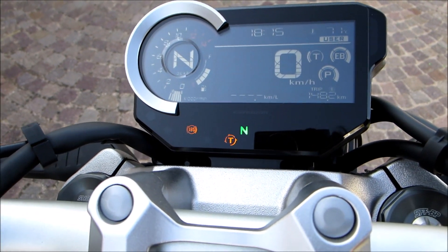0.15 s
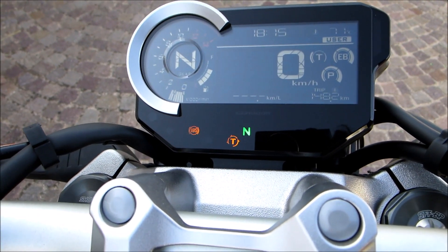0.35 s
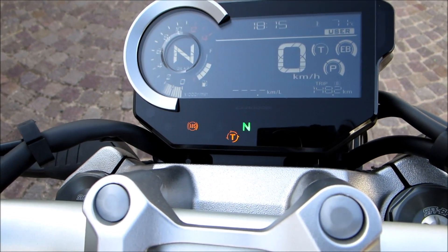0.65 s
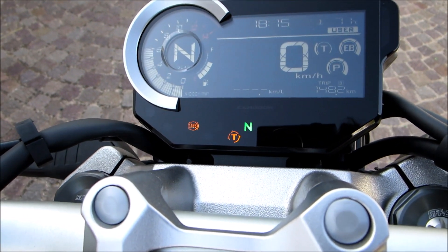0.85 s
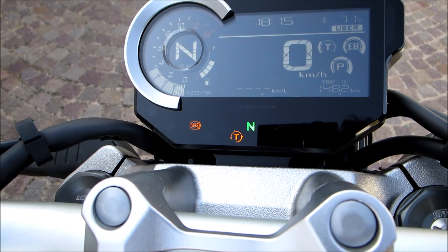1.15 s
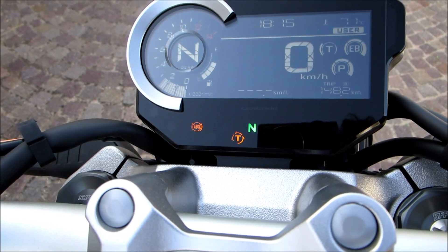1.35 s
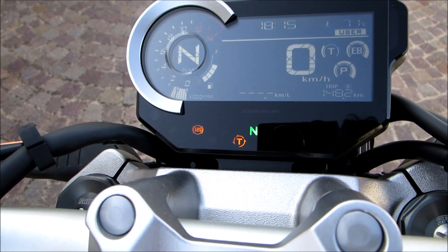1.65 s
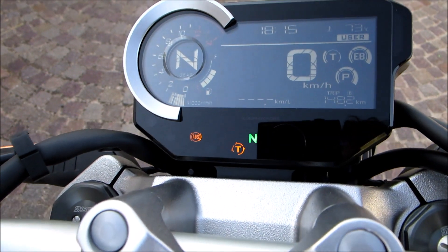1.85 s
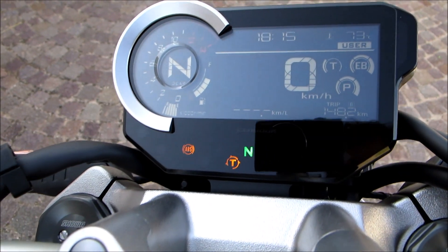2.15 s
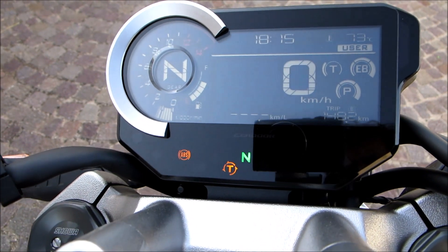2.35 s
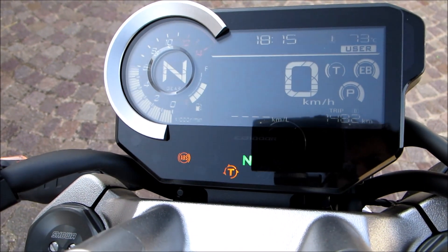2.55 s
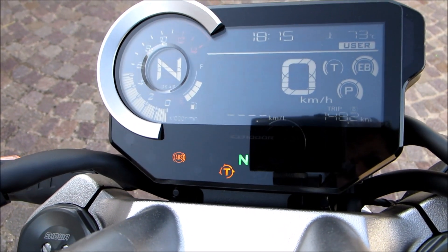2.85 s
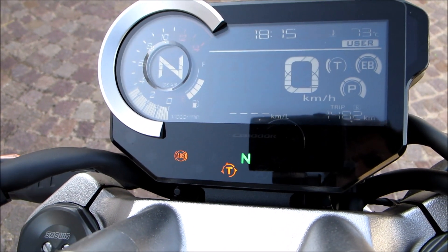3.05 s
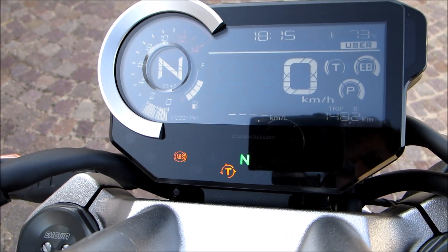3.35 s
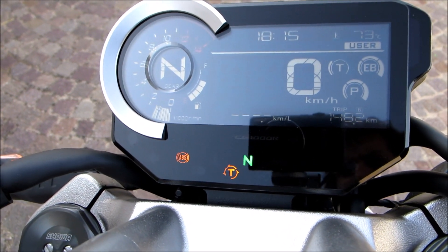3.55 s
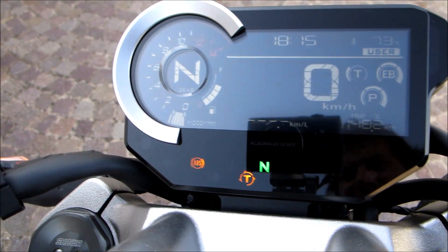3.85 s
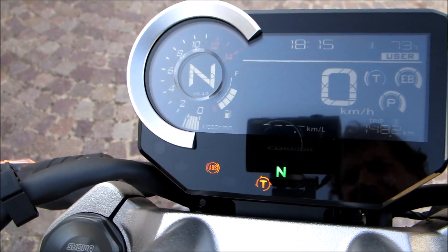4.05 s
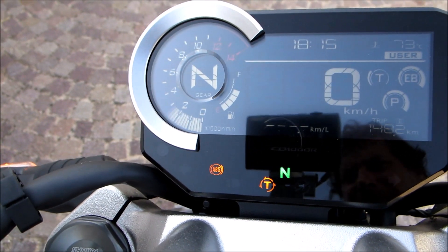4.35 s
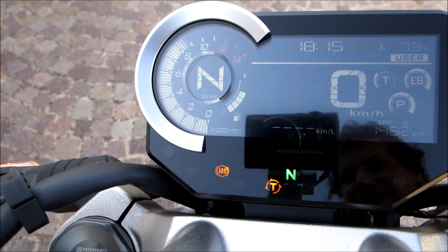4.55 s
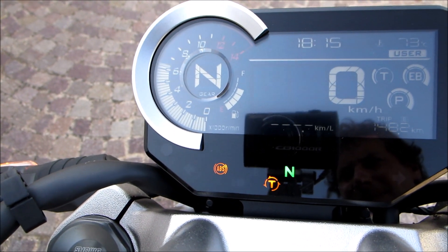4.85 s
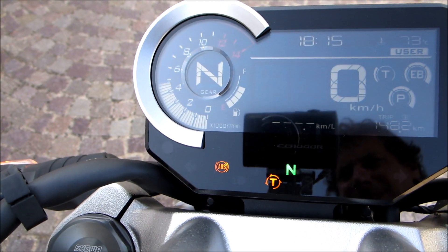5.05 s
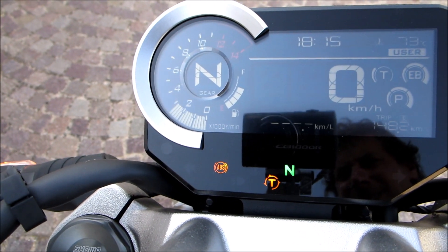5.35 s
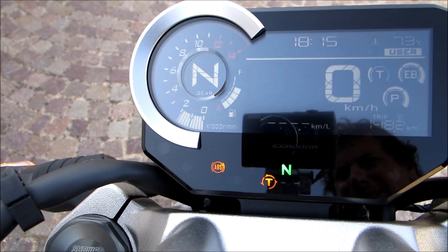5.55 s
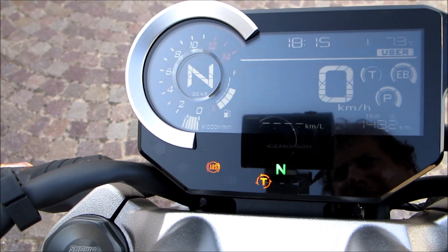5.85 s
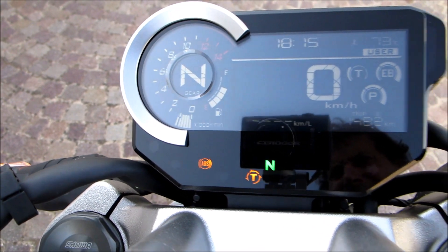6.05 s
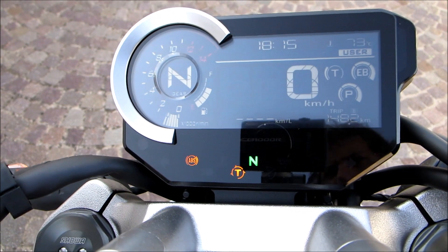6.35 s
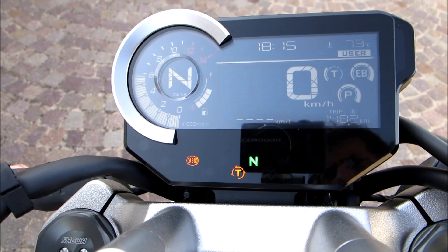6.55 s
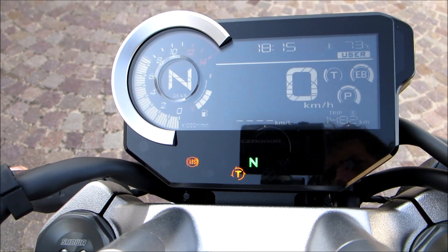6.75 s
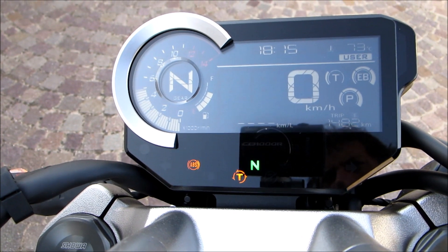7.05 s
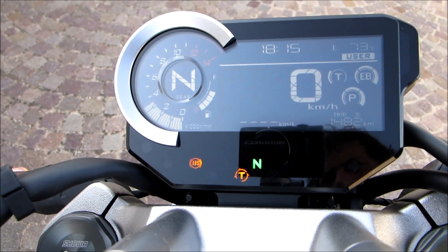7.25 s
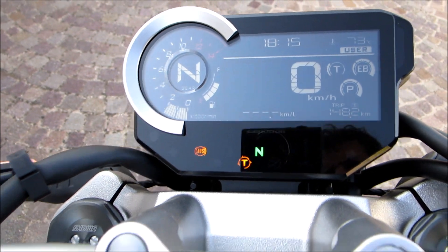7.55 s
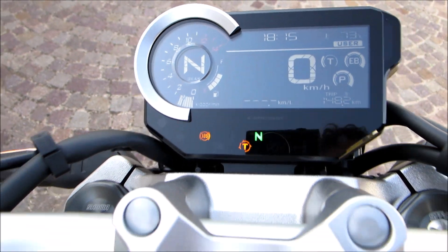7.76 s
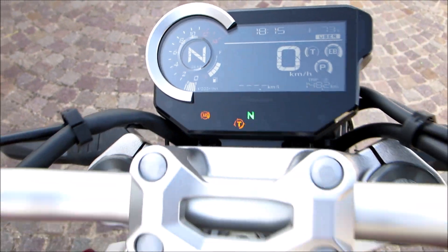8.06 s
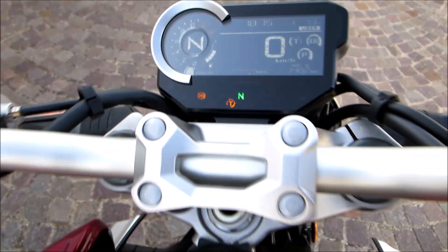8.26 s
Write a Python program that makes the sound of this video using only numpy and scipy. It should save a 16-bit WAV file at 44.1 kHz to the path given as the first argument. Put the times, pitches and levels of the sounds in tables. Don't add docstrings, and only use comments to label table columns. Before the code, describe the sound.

A stationary four-cylinder motorcycle is heard from the saddle, close and outdoors over stone paving, in stereo with only a very short ground echo. From 0 to 0.55 seconds it idles loud and uneven, with about 38 firings a second, clattering valve gear and hard metallic cracks. At 0.6 the throttle snaps open: air gulps in, the growl climbs fast, peaks near 0.8, then glides down smoothly until about 1.4. Lumpy idle ticks on. A second, quickest blip rises from 2.35, peaks near 2.6 and falls until 3.4. Stumbling, somewhat quieter idle follows. The third, longer blip begins at 4.25, peaks around 4.55 with a soft exhaust thump, and sinks until 5.5. After more faltering idle, the last, rounder blip starts at 6.4, peaks near 6.65 and falls until 7.5. Rough idling, low shudder and light hiss continue to the end at 8.4.

```python
import sys
import numpy as np
from scipy import signal
from scipy.fft import rfft, irfft
from scipy.io import wavfile
from scipy.ndimage import uniform_filter1d

SR = 44100
rng = np.random.default_rng(int(sys.argv[2]) if len(sys.argv) > 2 else 0)


def wav_record(signal):
    frames = np.transpose(np.atleast_2d(signal))
    bounded = np.clip(frames, -1, 1)
    quanta = np.round(bounded * 32767).astype(np.int16)
    wavfile.write(sys.argv[1], SR, quanta)


def undo_db(level):
    steps = np.asarray(level, float) / 20
    return 10 ** steps


N = 369999
T = np.arange(N) / SR

# open_s, shut_s (fuel is cut), relight_s
BLIPS = [
    (0.585, 0.772, 1.44),
    (2.344, 2.587, 3.385),
    (4.24, 4.546, 5.49),
    (6.37, 6.649, 7.52),
]
# up_s (passes 100 firings a second), climb_per_s, down_s (passes 100 again),
# sharpness of the top (no unit)
REVS = [
    (0.691, 8.5, 1.268, 5.0),
    (2.464, 9.2, 3.177, 4.2),
    (4.363, 6.7, 5.313, 4.7),
    (6.464, 7.2, 7.346, 3.5),
]
DRAG_PER_S, FRICTION_HZ = .75, 187
CATCH_HZ, SETTLE_HZ_PER_S = 76.3, 85
# time_s, firing_rate_hz
IDLE_SPEED = [(0.0, 37.08), (0.12, 40.4), (0.4, 38.47), (0.55, 39.91), (1.8, 39.08), (2.0, 34.47),
              (2.2, 40.43), (2.34, 33.92), (3.72, 35.74), (3.95, 37.54), (4.1, 36.12), (5.9, 36.36),
              (6.25, 36.17), (7.8, 36.7), (8.39, 37.56)]
# time_s, level_db
LOUDNESS_DRIFT = [(0.0, 12), (0.3, 10.5), (0.56, 11.5), (0.82, 2), (1.1, 7.5), (1.4, 4), (1.75, 3), (2.3, 5),
                  (2.7, -1.5), (3.1, 2), (3.7, 1.2), (4.2, 2.5), (5.0, -0.6), (5.9, -0.8), (6.3, 1.5),
                  (7.2, -0.7), (7.9, -1.2), (8.39, -0.3)]

# pitch_hz, level_db
PIPE = [(15, -48), (37, -25), (75, -11.5), (95, 1.5), (112, 7.5), (135, -1), (165, -14), (230, -3),
        (300, -6), (420, -14), (900, -63.5)]
# firing_rate_hz, level_db
BOOM_OPEN = [(42, -11), (58, -11.5), (80, -15.5), (115, -10), (165, -20), (220, -14.5), (290, -14.5)]
# firing_rate_hz, level_db
BOOM_CUT = [(68, -24.5), (95, -16.5), (120, -11.5), (140, -16.5), (165, -23), (205, -15.5), (250, -16),
            (290, -19)]
BOOM_IDLE_DB = -22
# time_s, level_db, length_s
STUMBLES = [(0.192, -13, 0.0079), (0.24, -12, 0.013), (0.438, -7, 0.025), (1.615, -9, 0.018),
            (2.25, -5, .02), (3.54, -7, 0.048), (3.725, -5.5, 0.044), (4.002, -10, 0.017),
            (4.09, -16, 0.01), (4.139, -11, 0.015), (4.235, -10, 0.025), (5.556, -12, .015),
            (5.622, -8, 0.011), (5.69, -6, 0.02), (5.779, -23, .022), (5.913, -4.5, .03),
            (6.09, -11, 0.019), (6.23, -9, .022), (7.736, -6, 0.039), (8.066, -8, 0.014),
            (8.197, -10, .018)]
PUMP_FALL_DB, PUMP_SCATTER_DB = -15.5, .4
SOFT_HZ, SOFT_SPAN_HZ, SOFT_DB = 95, 20, -8
UNEVEN_HZ, UNEVEN_SPAN_HZ, UNEVEN_DROP_DB = 218, 60, -12
# start_s, level_db, pitch_hz, length_s
LATE_BURNS = [
    (4.6, -25, 95, 0.076),
    (6.679, -31, 92.2, 0.076),
]

# pitch_hz, level_db (per Hz)
SHELL_SHUT = [(100, -26.5), (170, -9), (220, -8), (310, -6.5), (445, -4.5), (564, -17.5), (600, -5),
              (775, -7), (967, -4.5), (1400, -17.5), (1820, -35), (3080, -120)]
# pitch_hz, level_db (per Hz)
SHELL_OPEN = [(150, -36.5), (250, -4), (346, 2), (445, -7.5), (514, -5), (732, 4.5), (792, 8), (915, 2.5),
              (1400, -13), (1820, -84), (3080, -120)]
# pitch_hz, level_db (per Hz)
SHELL_FAST = [(190, -50), (320, -7), (484, -11), (551, -10), (828, 2.5), (903, 0), (1400, -9), (1820, -73),
              (3080, -120)]
# pitch_hz, level_db
CASING = [(130, -51.5), (200, -1), (330, -3), (440, -5.5), (580, -0.5), (750, -2.5), (900, -3.5),
          (1200, -7), (1700, -19.5), (2500, -18), (3200, -28)]
# pitch_hz, width_hz, level_db
RINGS = [(535, 33, 5.5), (909, 10.6, 9.5), (1044, 115, 5), (1703, 29, 3.5), (2416, 160, 3.5), (2676, 80, 7),
         (3530, 23, 5.5), (4190, 9.9, 6.5), (5640, 59, 0.5)]
# growl_db, gulp_db (first gulp of air), gulp_after_s
TWISTS = [
    (-14.5, -25.5, 0.055),
    (-15.5, -26.5, 0.08),
    (-16, -30.5, 0.12),
    (-15.5, -32, 0.097),
]
TWIST_S, GULP_S = .13, 0.048
LEAD_S, DRAUGHT_S, DRAUGHT_DB = 0.044, 0.043, -24
# time_s, level_db
RATTLES = [
    (0.35, -36),
    (1.685, -39),
    (2.27, -47),
    (6.26, -54),
    (8.37, -44.5),
]
RATTLE_S = 0.029
# start_s, peak_db, pitch_hz
CRACKS = [(0.148, -11.5, 910), (0.249, -14, 890), (0.272, -11.5, 1040), (0.374, -16, 935), (0.619, -7, 920),
          (0.648, -4, 783), (0.672, -5, 783), (0.708, -3.5, 900), (1.662, -21, 1080), (2.084, -20, 914.5),
          (2.164, -15, 790), (2.266, -18, 901), (2.418, -1, 785), (3.583, -20, 935), (3.778, -23, 950),
          (3.801, -19, 930), (4.011, -18, 1003), (4.152, -22, 890), (4.236, -17.5, 950), (5.57, -20.5, 940),
          (5.798, -21.5, 1041), (6.121, -24, 998), (6.259, -18, 1040), (6.451, -10, 836),
          (6.488, -4.5, 805), (7.797, -25, 946)]

# pitch_hz, level_db (per Hz)
CLATTER = [(760, -27.5), (1300, -4.5), (1410, -2.5), (1690, -0.5), (1970, -4), (2500, -7), (3100, -17.5),
           (4030, -25.5), (6820, -120)]
# pitch_hz, level_db (per Hz)
HISS = [(1710, -66), (2900, -2), (3240, -4.5), (3810, -3), (5230, -5.5), (5690, -5), (7490, -9.5),
        (13000, -18), (14600, -19), (15500, -33)]
RUSH_DB, RUSH_PER_OCTAVE_DB, RUSH_LAG_S = -31, 31, 0.024
GULP_HISS_DB, COAST_DRIFT = -6.5, 0.5
# idle_db, moving_db (at 100 firings a second), speed_db (per octave), drift_share (of the
# loudness drift at speed, no unit), shake_db
LAYERS = [
    (-34.5, -29.5, 8, 0.47, 1),
    (-46, -37.5, 8, 0.56, 2.5),
    (-53, -47, 9.5, 0.77, 2),
]
SHAKE_HZ, SHAKE_OCTAVES = 140, 0.63
SAG_AFTER_S, SAG_S, SAG_DB = 0.35, 0.12, -2.5

# pitch_hz, level_db
SHUDDER = [(10, -16), (35, 7), (55, -11), (200, 2), (600, -35.5)]
RUMBLE_DB = -48
ECHO_S, ECHO_DB = (0.00621, 0.00705), -21.5
# pitch_hz, likeness (0 to 1)
LIKENESS = [(60, 1), (150, 1), (380, .995), (950, 0.95), (2380, 0.5), (5980, 0.08), (10000, 0.27),
            (15000, 0.4)]
# pitch_hz, level_db
LEAN_LEFT = [(60, 0), (250, 0), (700, .9), (1400, 1.1), (3000, .2), (15000, .3)]
LEFT_LAG = 3


def speed():
    t = T[::64]
    total = np.interp(T, *np.transpose(IDLE_SPEED))[::64] ** 8
    for up, climb, down, sharp in REVS:
        rising = 100 * np.exp(np.clip(climb * (t - up), -9, 9))
        coasting = (100 + FRICTION_HZ) * np.exp(DRAG_PER_S * np.minimum(down - t, 2)) - FRICTION_HZ
        caught = CATCH_HZ - SETTLE_HZ_PER_S * (t - down)
        falling = np.maximum(np.maximum(coasting, caught), 1)
        total = total + (rising ** -sharp + falling ** -sharp) ** (-8 / sharp)
    return np.interp(T, t, total ** (1 / 8))


def exhaust(hz, turns, cut, opened):
    idle = np.clip(1 - cut - opened, 0, 1)
    late = 0.046 * idle * uniform_filter1d(per_firing(turns), size=900)
    rounded_db = -.3 - (0.22 + 1.13 * idle) * (hz / 37) ** 2
    burning = orders(turns + late, rounded_db, 1.69, -25.0, count=14)
    burning = undo_db((1.5 + 2.7 * idle) * per_firing(turns)) * burning

    fall_db = PUMP_FALL_DB + SOFT_DB * np.clip((SOFT_HZ - hz) / SOFT_SPAN_HZ, 0, 1)
    uneven_db = -20.5 + UNEVEN_DROP_DB * np.clip((UNEVEN_HZ - hz) / UNEVEN_SPAN_HZ, 0, 1)
    pumping = orders(turns, fall_db, 1.0, uneven_db, count=6, flicker_db=4.7)
    pumping = pumping + undo_db(-19.5) * np.cos(8 * np.pi * turns)
    pumping = undo_db(PUMP_SCATTER_DB * per_firing(turns)) * pumping

    boom = coloured((1 - cut) * burning + cut * pumping, PIPE)
    return undo_db(boom_db(hz, cut, between(0, edge_s=0.12))) * levelled(boom, 0.023)


def boom_db(hz, cut, opened):
    drift = np.interp(T, *np.transpose(LOUDNESS_DRIFT))
    idle = np.clip(1 - cut - opened, 0, 1)
    idle_db = BOOM_IDLE_DB + drift + sum(db * bump(s, long) for s, db, long in STUMBLES)
    coast_db = read(BOOM_CUT, hz) + COAST_DRIFT * drift
    states = [(opened, read(BOOM_OPEN, hz)), (cut, coast_db), (idle, idle_db)]
    return sum(weight * db for weight, db in states) / sum(weight for weight, _ in states)


def late_burns():
    total = 0
    for s, db, hz, long in LATE_BURNS:
        swell = np.sin(np.pi * np.clip((T - s) / long, 0, 1)) ** 2
        total = total + undo_db(db) * swell * np.sin(2 * np.pi * hz * T)
    return total


def growl(hz, turns, cut, opened):
    fast = np.clip((hz - 50) / 120, 0, 1)
    upper = orders(turns, -.8, 1, -17 + 13 * fast, count=18, size=4, flicker_db=5)
    clean = levelled(coloured(upper, CASING, size=8192), 0.36)

    gas = levelled(puffs(turns - .15, depth=.45, sharp=.7), .2) + .6 * (1 - cut) * knocks(turns)
    coasting = cut * fast ** 2
    rest = np.clip(1 - opened - coasting, 0, 1)
    states = [(opened, SHELL_OPEN), (coasting, SHELL_FAST), (rest, SHELL_SHUT)]
    rough = sum(weight * levelled(coloured(gas, shell, size=4096), 0.069) for weight, shell in states)

    share = fast * (.46 + .1 * cut)
    mix = np.sqrt(share) * clean + np.sqrt(1 - share) * levelled(rough, .1)
    roar, _ = intake()
    return np.hypot(strength(hz, 0), roar) * levelled(mix, 0.087)


def intake():
    roar = gulp = 0
    for (opens, shuts, _), (db, gulp_db, after) in zip(BLIPS, TWISTS):
        start = opens - LEAD_S
        roar = roar + undo_db(db) * np.clip((T - start) / TWIST_S, 0, 1) ** 2 * (T < shuts)
        draught = undo_db(db + DRAUGHT_DB) * np.clip((T - start) / DRAUGHT_S, 0, 1) * (T < shuts)
        gulp = gulp + np.hypot(draught, undo_db(gulp_db) * bump(opens + after, GULP_S))
    gulp = gulp + sum(undo_db(db) * bump(s, RATTLE_S) for s, db in RATTLES)
    return uniform_filter1d(roar, size=900), uniform_filter1d(gulp, size=900)


def cracks():
    out, t = np.zeros(N), np.arange(1200) / SR
    for s, db, hz in CRACKS:
        ring = undo_db(db - 2 - 60 * t / 0.043) * np.sin(2 * np.pi * hz * t)
        out[round(s * SR):][:1200] += ring * np.clip(t / 0.00027, 0, 1)
    return out


def lull():
    gain = np.ones(N)
    for s, _, _ in CRACKS:
        gain[round(s * SR) - 500:round(s * SR)] = .6
    return uniform_filter1d(gain, size=90)


def valve_gear(hz, turns):
    fast = np.clip((hz - 120) / 150, 0, 1)
    _, gulp = intake()
    tick_turns = 2 * turns % 900
    whine = orders(turns, -1.05, 1, -16, count=21, size=10, flicker_db=6.0)
    ticks = puffs(tick_turns, depth=.4, sharp=.6) + .3 * knocks(turns) + .16 * fast * whine
    clatter = levelled(coloured(ticks, CLATTER, size=4096), 0.15)

    hiss = levelled(coloured(puffs(tick_turns, depth=0.074, sharp=0.37), HISS, size=4096), 0.14)
    lagging_hz = np.interp(T - RUSH_LAG_S, T, hz)
    rush = undo_db(RUSH_DB + RUSH_PER_OCTAVE_DB * np.log2(lagging_hz / 280))
    hiss_gain = np.hypot(strength(hz, 2), rush + undo_db(GULP_HISS_DB) * gulp)
    return np.hypot(strength(hz, 1), gulp) * clatter + hiss_gain * hiss


def strength(hz, layer):
    idle_db, moving_db, octave_db, share, shake_db = LAYERS[layer]
    drift = np.interp(T, *np.transpose(LOUDNESS_DRIFT))
    shake = shake_db * np.exp(-(np.log2(hz / SHAKE_HZ) / SHAKE_OCTAVES) ** 2)
    moving = undo_db(moving_db + share * drift + shake + octave_db * np.log2(hz / 100))
    return np.hypot(undo_db(idle_db + drift + SAG_DB * lean_burning()), moving)


def lean_burning():
    return sum(bump(down + SAG_AFTER_S, SAG_S) for _, _, down, _ in REVS)


def rumble(cut, opened):
    low = coloured(noise(), SHUDDER)
    return undo_db(RUMBLE_DB - 3.8 * np.clip(cut + opened, 0, 1)) * levelled(low, .5)


def paving(x):
    x = x * np.ones((2, 1))
    echo = np.array([np.roll(side, round(s * SR)) for side, s in zip(x, ECHO_S)])
    return x + undo_db(ECHO_DB) * echo


def orders(turns, fall_db, bend, odd_db, count, size=1, flicker_db=0):
    total = 0
    for k in range(size, count):
        flicker = np.interp(T, np.arange(360) * .025, rng.standard_normal(360))
        db = fall_db * max(k / 2 - 1, 0) ** bend + odd_db * (k % 2) + flicker_db * flicker
        total = total + undo_db(db) * np.cos(np.pi * k * turns - 0.46 * k * (k % 2))
    return total


def puffs(turns, depth, sharp):
    swell = np.exp((np.cos(2 * np.pi * turns) - 1) / sharp)
    return noise() * (1 - depth + depth * swell * undo_db(0.86 * per_firing(turns)))


def knocks(turns):
    at = np.flatnonzero(np.diff(np.floor(2 * turns + .12 * per_firing(turns))) > 0)
    sizes = undo_db(1.9 * rng.standard_normal(3000)[:len(at)])
    clicks = np.zeros(N)
    clicks[at] = sizes * rng.choice([-1, 1], 3000)[:len(at)]
    return levelled(clicks, 1.0)


def per_firing(turns):
    held = rng.standard_normal(2000)[(turns + .5).astype(int)]
    return uniform_filter1d(held, size=150)


def noise():
    a, b = rfft(rng.standard_normal((2, N + 1)))
    same = np.clip(read(LIKENESS, np.fft.rfftfreq(N + 1, 1 / SR)), 0, 1)
    return irfft([a, same * a + np.sqrt(1 - same ** 2) * b])[:, :N]


def coloured(x, points, size=16384):
    hz = np.fft.rfftfreq(size, 1 / SR)
    rings_db = sum(db / (1 + (2 * (hz - f) / width) ** 2) for f, width, db in RINGS)
    half = np.log(undo_db(np.maximum(read(points, hz) + rings_db, -100)))
    full = np.r_[half, half[-2:0:-1]]
    taps = np.fft.ifft(np.exp(np.conj(signal.hilbert(full)))).real[:size // 2]
    return signal.oaconvolve(np.atleast_2d(x), taps[None], axes=1)[:, :N]


def levelled(x, s):
    power = (np.atleast_2d(x) ** 2).mean(0)
    for _ in range(2):
        power = uniform_filter1d(power, max(int(s * SR), 2))
    return x / np.sqrt(abs(power) + 1e-14)


def between(column, edge_s):
    inside = sum((T > row[column]) & (T < row[column + 1]) for row in BLIPS)
    return uniform_filter1d(inside * 1., max(int(edge_s * SR), 2))


def bump(s, long):
    return np.exp(-np.minimum(((T - s) / long) ** 2, 50))


def read(points, hz):
    f, value = np.transpose(points)
    return np.interp(np.log(hz + 1), np.log(f + 1), value)


def scene():
    hz = speed()
    turns = np.cumsum(hz) / SR
    cut = between(1, edge_s=.03)
    opened = between(0, edge_s=0.15)
    force = lull() * levelled(undo_db(1.41 * (1 - .5 * cut) * per_firing(turns - .3)), 0.36)
    pipe = exhaust(hz, turns, cut, opened) + late_burns()
    shell = undo_db(-0.43) * paving(force * growl(hz, turns, cut, opened) + cracks())
    return pipe + shell + force * valve_gear(hz, turns) + rumble(cut, opened)


def top_cut(x):
    return signal.sosfilt(signal.butter(12, 15690, fs=SR, output="sos"), x)


def record(dry):
    hz = np.fft.rfftfreq(N + 1, 1 / SR)
    tone = undo_db(np.outer([.5, -.5], read(LEAN_LEFT, hz)))
    delay = np.exp(-2j * np.pi * np.outer([LEFT_LAG, 0], hz) / SR)
    heard = irfft(rfft(dry, N + 1) * tone * delay)[:, :N]
    limited = 1.306 * np.tanh(heard / 1.289)
    return top_cut(limited)


dry = scene()
out = record(dry)
wav_record(out)
```